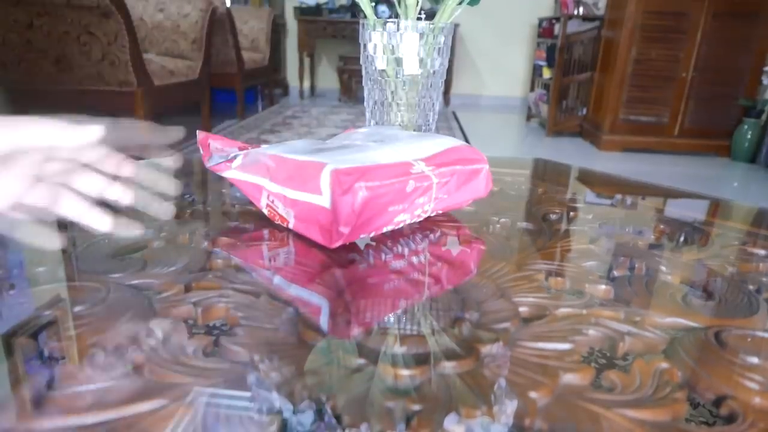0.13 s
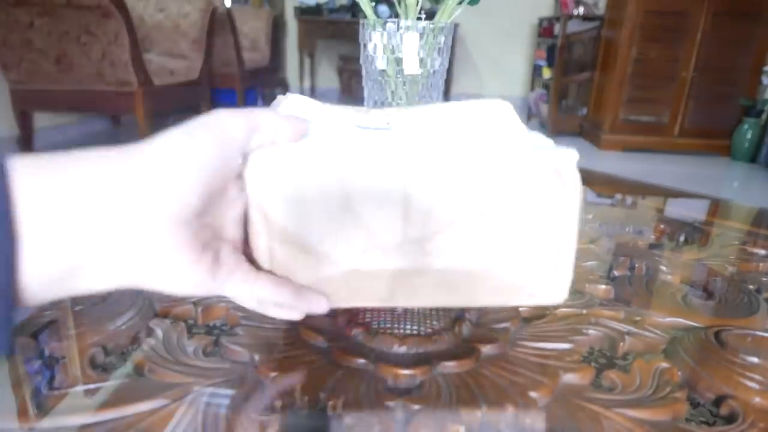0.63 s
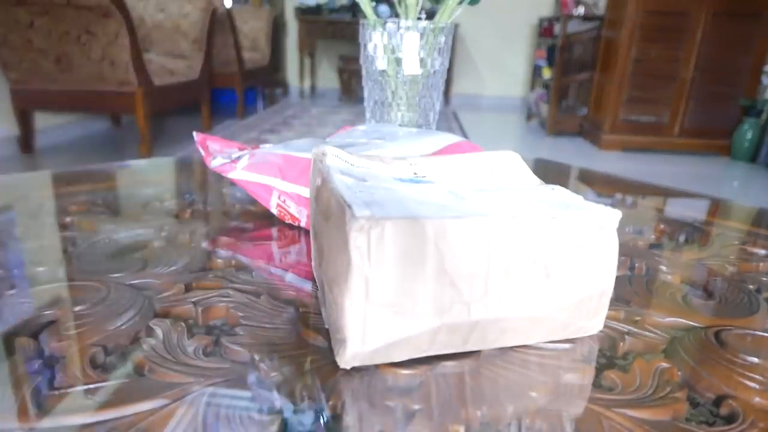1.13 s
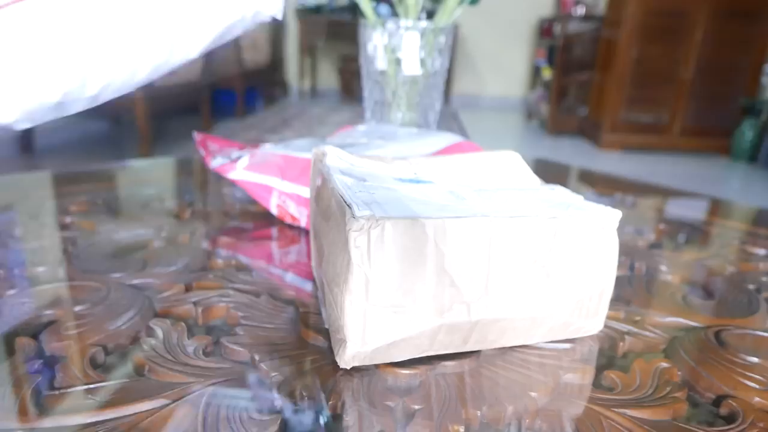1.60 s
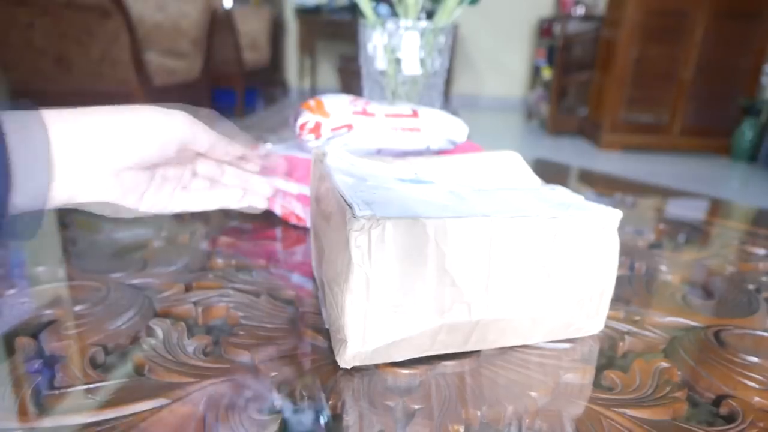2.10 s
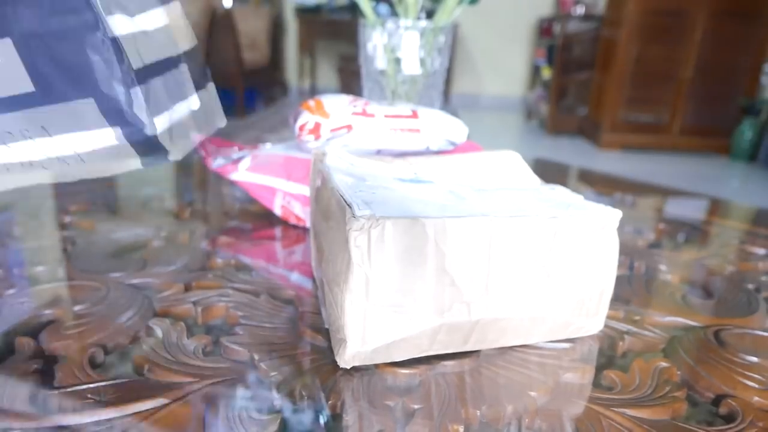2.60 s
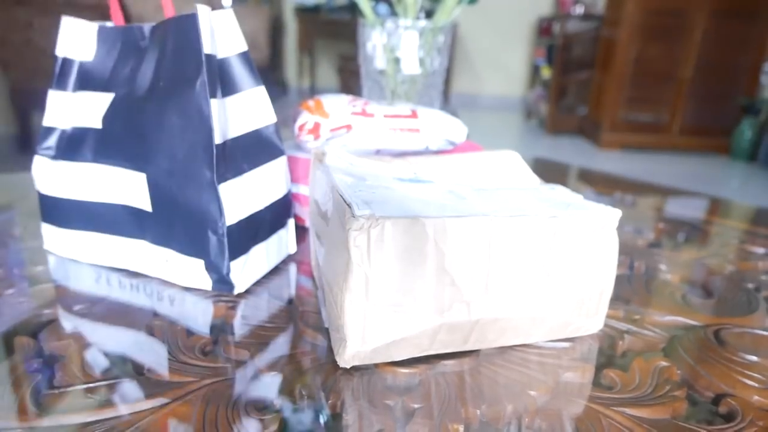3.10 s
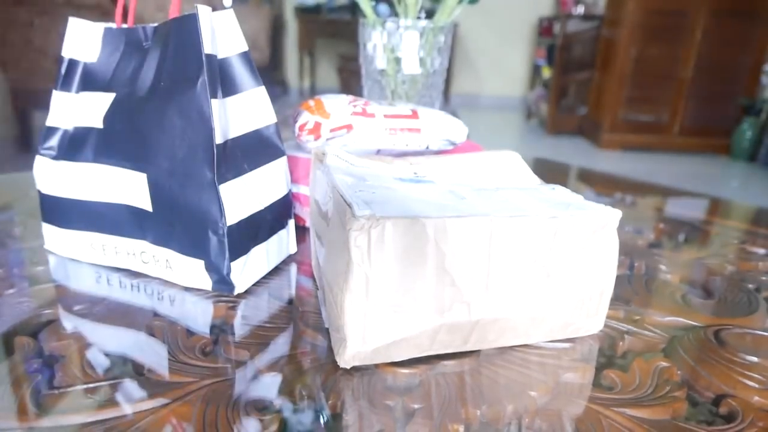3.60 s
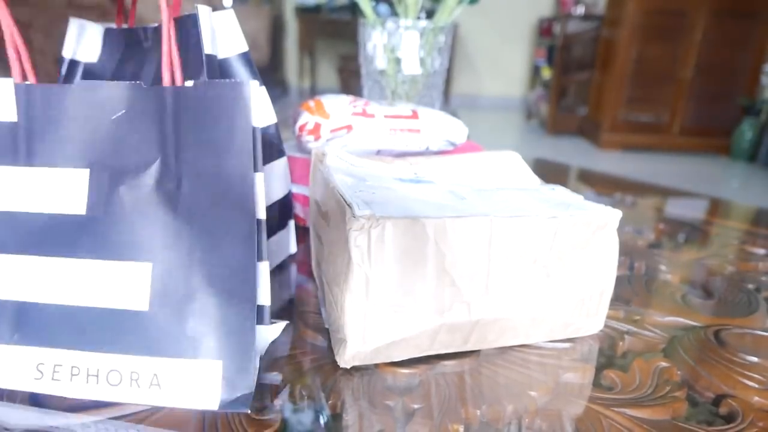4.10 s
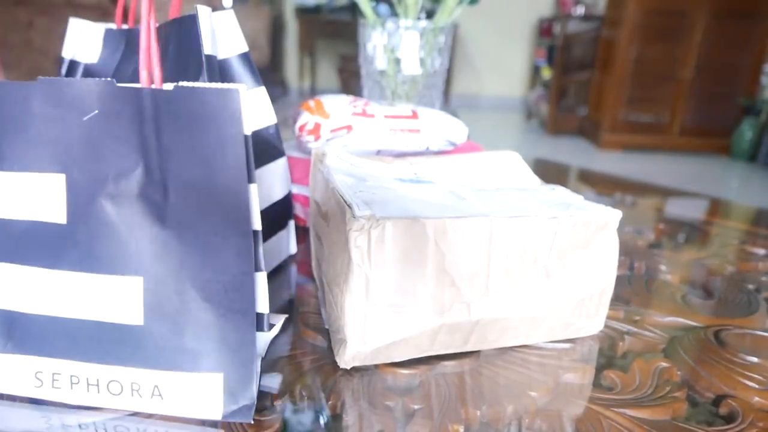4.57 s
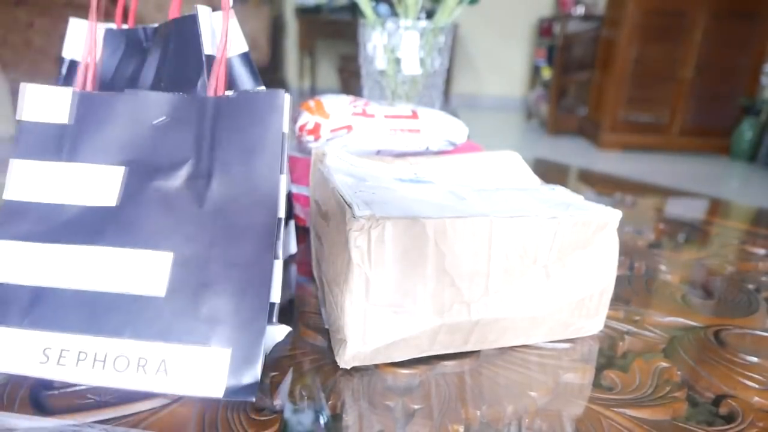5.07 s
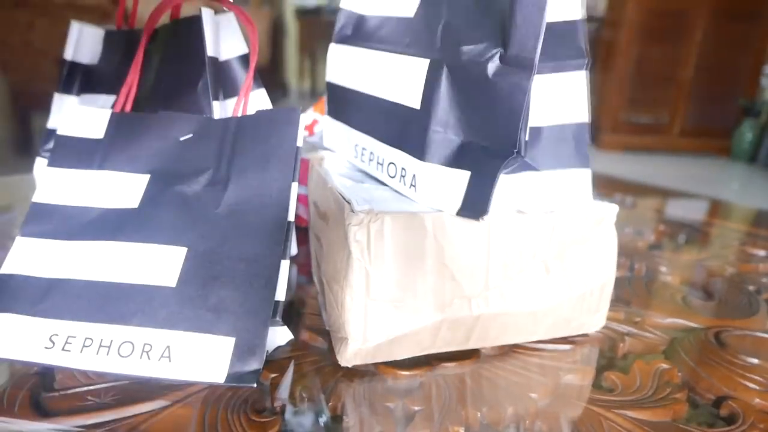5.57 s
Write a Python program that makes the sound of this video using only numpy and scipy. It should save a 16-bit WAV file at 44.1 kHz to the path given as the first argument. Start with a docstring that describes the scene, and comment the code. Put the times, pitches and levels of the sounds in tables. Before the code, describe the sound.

Quick wrapping crackle, a pause, then a crunchy double knock as a parcel meets the glass tabletop. Next comes a lighter rustling pack with a short film squeak, then two hard bag thumps about a second apart, and finally a cluster of loud paper cracks and knocks. The room answers with a short diffuse tail; a steady low hum lies beneath. Close stereo phone pickup, slightly shifting left and right.

```python
"""Parcels and paper bags are set down one after another on a glass-topped table in a tiled room, near a phone.
Each landing is a burst of pushes that rings load and table top while the wrapping crunches.
Creases snap as short ringing cracks, paper rustles as crackle in hiss, plastic film creaks in quickening slips.
A diffuse noise tail answers as the room; below lies a steady hum of noise bands, with faint noise chirps outside.
The level dips briefly five times."""
import sys
import numpy as np
from scipy import signal
from scipy.fft import rfft, irfft
from scipy.io import wavfile
from scipy.ndimage import uniform_filter1d

SR = 44100
rng = np.random.default_rng(int(sys.argv[2]) if len(sys.argv) > 2 else 0)


def to_linear_factor(level_db):
    """Convert decibel levels (scalar or array-like) to linear amplitude factors."""
    exponent = np.asarray(level_db, float) / 20
    return 10 ** exponent


def transcribe(signal):
    """Save signal, clipped to [-1, 1], as a 16-bit WAV file at the path in sys.argv[1]."""
    frames = np.atleast_2d(signal).T
    limited = np.clip(frames, -1, 1)
    pcm = np.round(limited * 32767).astype(np.int16)
    wavfile.write(sys.argv[1], SR, pcm)


N = 251193
T = np.arange(N) / SR
OPPOSITE = np.array([[1], [-1]])  # side signal: inverted on the right


def shape(x, points):
    """Zero-phase filter through (f/Hz, gain/dB) points, linear in log frequency."""
    hz, db = np.transpose(points)
    size = x.shape[-1]
    log_f = np.log(np.fft.rfftfreq(size, 1 / SR) + 1)
    gain = to_linear_factor(np.interp(log_f, np.log(hz), db))
    return irfft(rfft(x) * gain, size)


def unit(x):
    """Scale to rms 1."""
    return x / np.sqrt(np.mean(x ** 2))


def band(x, lo_hz, hi_hz):
    """Gentle causal band-pass."""
    return signal.sosfilt(signal.butter(1, [lo_hz, min(hi_hz, .45 * SR)], "band", fs=SR, output="sos"), x)


def dull(x, top_hz):
    """Second-order low-pass."""
    return signal.sosfilt(signal.butter(2, min(top_hz, .45 * SR), fs=SR, output="sos"), x)


def thin(x):
    """Small objects radiate almost no deep bass: steep high-pass."""
    return signal.sosfilt(signal.butter(6, 120, "high", fs=SR, output="sos"), x)


def fade(t, t60):
    """Exponential decay, 60 dB in t60 seconds (at least 2 ms)."""
    return np.exp(-np.log(1000) * t / max(t60, .002))


def walk(rate):
    """Random levels held 1 / rate seconds, then smoothed twice."""
    k = int(SR / rate)
    held = np.repeat(rng.standard_normal(N // k + 1), k)
    return 0.82 * uniform_filter1d(uniform_filter1d(held, k), k)[:N]


def crackle(size, rate, spread_db):
    """Random clicks of uneven size, rate per second, at rms 1."""
    hits = rng.random(size) < rate / SR
    return unit(hits * rng.standard_normal(size) * to_linear_factor(spread_db * rng.exponential(size=size)))


def modes(table, t, spread_db, detune):
    """Sum of decaying sines from (f/Hz, level/dB, T60/s) rows, level and pitch varied at random per strike."""
    luck = rng.standard_normal((len(table), 2))
    return sum(to_linear_factor(db + spread_db * a) * np.sin(2 * np.pi * hz * (1 + detune * b) * t) * fade(t, ring)
               for (hz, db, ring), (a, b) in zip(table, luck))


def sides(pan_db):
    """Left and right gains for a left-minus-right difference."""
    return to_linear_factor(np.array([pan_db, -pan_db]) / 2)


def place(s):
    """Left and right gains where the hands are at work at time s."""
    # hand position: t/s, left minus right/dB
    pan = [(0, 2), (.55, 4.5), (.75, 0), (1.6, 6.5), (1.95, 1), (2.84, 5), (3.0, -3.5), (3.2, 6.5),
           (4.13, 6), (4.25, -3), (4.42, 8), (5.1, 6), (5.3, -1), (5.7, -1)]
    return sides(np.interp(s, *np.transpose(pan)))


def add(out, s, x):
    """Mix a short sound in at time s."""
    i = int(s * SR)
    out[..., i:i + x.shape[-1]] += x[..., :N - i]


def hum():
    """Fans and distant traffic: noise in half-octave bands that waver together and apart."""
    # mid spectrum: f/Hz, density/dB per Hz
    colour = [(15, -50), (40, -29), (80, -28.5), (108, -27.5), (130, -12.5), (170, -8), (242, -3.5),
              (344, -2), (373, -9), (695, -13.5), (754, -7), (911, -14.5), (988, -16), (1890, -26),
              (14000, -41), (16000, -48)]
    # stereo width: f/Hz, side minus mid/dB
    width = [(60, -23), (110, -8), (200, -31), (380, -16.5), (700, -9), (1290, -1.5), (2380, -2.5),
             (4400, -5), (8120, -5), (15000, -3)]
    mid, side = shape(rng.standard_normal((2, N)), colour)
    both = (mid + shape(side, width) * OPPOSITE) / np.sqrt(np.mean(mid ** 2))
    out, swell = 0, walk(1.79)
    for hz in 30 * 2 ** np.arange(0, 9.1, .5):
        skirts = [(hz / 2 ** .5, -80), (hz / 2 ** .25, -6), (hz, 0), (hz * 2 ** .25, -6), (hz * 2 ** .5, -80)]
        waver_db = 0.17 * swell + 0.99 * walk(6.31)
        out = out + to_linear_factor(waver_db) * shape(both, skirts)
    return to_linear_factor(-46.5) * unit(out)


def rustle():
    """Handled wrappings: tiny crackles in a rubbing hiss; the push on the table adds a dull rumble."""
    # swell per squeeze or slide: peak t/s, level/dB, rise/s, fall/s, treble against level/dB
    handling = [(0.002, -41.5, 0.014, 0.22, -1.5), (.078, -51, .05, 0.13, -14),
                (.525, -53.5, .03, 0.31, -11), (0.684, -31.5, 0.076, 0.13, -2.5),
                (0.75, -28, 0.036, 0.15, -4), (.93, -41, 0.17, 0.22, -8), (1.3, -55, 0.99, 0.12, -10),
                (1.42, -50.5, 0.3, 0.35, -9), (1.662, -45.5, 0.057, 0.37, -5),
                (1.838, -49.5, 0.039, 0.076, 0), (1.886, -41, .07, 0.14, -4),
                (1.948, -28.5, 0.0094, 0.19, -7), (2.824, -54, 0.4, 0.059, -5),
                (2.842, -23, 0.0061, 0.13, -13.5), (2.88, -26.5, 0.032, 0.084, -15.5),
                (2.965, -52.5, .05, .3, -16), (3.172, -57, 0.013, .45, -24),
                (4.131, -21.5, .007, 0.036, -10), (4.149, -34, 0.024, .14, -10.5),
                (4.232, -59, .05, 0.55, -12), (4.42, -58.5, .1, 0.047, -9), (5.25, -56, 0.082, 0.52, -4),
                (5.321, -28.5, 0.015, 0.13, -5), (5.404, -33, 0.071, 0.15, -2.5),
                (5.5, -47, 0.14, 0.29, -5.5), (5.674, -33.5, 0.064, 0.12, -11.5)]
    # paper spectrum: f/Hz, density/dB per Hz
    colour = [(530, 0), (900, 3.5), (2330, 1.5), (2730, -2), (2960, 1), (4920, -2.5), (9770, -4.5),
              (14700, -10.5), (16000, -28)]
    swell_db, rumble_db = 30, -7  # climb and drop over rise and fall; rumble against rustle
    level, treble = 0, 0
    for s, db, rise_s, fall_s, treble_db in handling:
        away = np.maximum((s - T) / max(rise_s, .002), (T - s) / max(fall_s, .01))
        swell = to_linear_factor(db - swell_db * away)
        level = level + swell
        treble = treble + to_linear_factor(treble_db) * swell
    mid, side = to_linear_factor(2.8 * walk(60)) * rng.standard_normal((2, N))
    grains = .45 * crackle(N, 3500, spread_db=2.5)
    raw = shape(grains + mid + 0.4 * side * OPPOSITE, colour)
    low = shape(raw, [(5500, 0.5), (8000, -35.5)])
    paper = level * unit(low) + treble * unit(raw - low)
    rumble = unit(shape(mid, [(40, -90), (90, -45), (160, 11.5), (350, 17), (900, 5.5), (1500, -60)]))
    return place(T) * paper + to_linear_factor(rumble_db) * level * rumble


def snaps():
    """A buckling crease: one sharp crack that rings the sheet, a few milliseconds of noise, quick echoes."""
    # creases: t/s, peak/dB, pitch f/Hz, crack against sheet/dB
    creases = [(0.054, -29.5, 1670, 1), (0.071, -28, 4300, 7), (0.121, -18.5, 4240, 11),
               (0.1335, -38, 9000, -10), (0.3975, -29.5, 2460, 0.5), (0.4573, -35, 3900, -29.5),
               (0.516, -39.5, 2370, -7), (0.6585, -27, 2970, -10), (0.6704, -23.5, 1900, -2),
               (0.7425, -10.5, 4300, 5), (0.792, -15.5, 1940, 0.5), (0.8855, -25.5, 1800, 3),
               (0.929, -30, 2600, -8), (0.9432, -23.5, 3300, 1), (1.6468, -26.5, 5830, -5),
               (1.6756, -27.5, 4300, 11), (1.731, -35, 5960, -6), (1.748, -32, 4300, 2),
               (1.7585, -24, 4340, 1), (1.7884, -39, 4850, 3), (1.8827, -26.5, 4540, 0),
               (1.934, -26, 2540, -16), (1.9419, -15.5, 2540, 2), (1.975, -12.5, 2610, 4),
               (2.0064, -22.5, 4280, 9), (2.8783, -9.5, 1340, -16), (2.8828, -8, 3100, -19),
               (2.9159, -25, 5010, -17), (3.123, -41.5, 3500, -25), (3.168, -16, 2860, -24),
               (3.2735, -30, 12000, -20), (4.129, -8, 1380, -7), (4.1385, -5, 2350, -30),
               (4.1759, -16, 2320, -28), (4.4117, -31, 2190, -11), (4.361, -43, 4800, -25),
               (4.439, -40, 1940, -10), (5.0425, -30.5, 4280, 7), (5.3223, -14.5, 5000, 3),
               (5.339, -5.5, 1580, -9.5), (5.3762, -3.5, 2850, -29), (5.3963, 0, 2660, -9.5),
               (5.409, -15, 4300, 10), (5.4872, -23.5, 1630, -19), (5.538, -27, 2100, 0),
               (5.5578, -21.5, 1490, -23), (5.6096, -28, 2450, -19), (5.6513, -4, 1640, -11),
               (5.682, -9.5, 4470, -14), (5.6888, -14, 2090, -9)]
    # nearest surfaces: delay/s, level/dB
    echoes = [(.0005, -5), (.0021, -4), (.0034, -14)]
    out, t = np.zeros((2, N)), T[:SR // 15]
    for s, db, hz, treble_db in creases:
        ring_s = 0.0073 + 0.01 * db  # 7.3 ms at 0 dB; the 2 ms floor in fade() holds from about -0.5 dB down
        noise = .33 * rng.standard_normal(len(t)) * fade(t, ring_s)
        noise[int(.0003 * SR)] -= 1.6  # the buckling jolt
        body = band(band(noise, hz / 0.97, hz * 1.22), hz / 1.9, hz * 0.9)
        broad = band(band(noise, hz / 2.0, hz * 2.67), hz / 1.8, hz * 2.55)
        sheet = dull(body + 0.39 * broad, hz * 1.94)
        crack = band(band(noise * fade(t, ring_s), 3800, 15500), 3000, 15600)
        snap = sheet / np.abs(sheet).max() + to_linear_factor(treble_db) * crack / np.abs(crack).max()
        stretch = 1 + 0.303 * rng.standard_normal(len(echoes))
        snap = snap + sum(to_linear_factor(echo_db) * np.interp(t - delay * k, t, snap, left=0)
                          for (delay, echo_db), k in zip(echoes, stretch))
        add(out, s, to_linear_factor(db) * place(s)[:, None] * snap / np.abs(snap).max())
    return out


def thuds():
    """A soft load lands in one push and a scatter of smaller ones; load and table top ring, wrapping crunches."""
    # landings: peak t/s, peak/dB, load pitch f/Hz, settling T60/s, crunch level/dB
    landings = [(0.6725, -24.5, 617, 0.018, -36), (0.6923, -34, 590, 0.035, -43),
                (0.7443, -11.5, 590, 0.023, -31), (0.7877, -17, 350, 0.02, -35),
                (0.887, -13.5, 316, 0.024, -47), (0.9319, -26, 600, 0.067, -44),
                (1.693, -32.5, 410, 0.05, -50), (1.9456, -23.5, 550, 0.013, -54),
                (1.9702, -17, 490, 0.034, -45), (2.027, -26, 440, 0.03, -40.5),
                (2.5114, -34.5, 195, 0.077, -66.5), (2.846, -2.5, 562, 0.031, -23),
                (2.8706, -9.5, 780, 0.033, -25), (2.8866, -8.5, 517, 0.063, -31),
                (3.0173, -24, 690, 0.017, -55), (3.1674, -20.5, 880, 0.023, -39),
                (4.131, -11.5, 755, 0.027, -28), (4.1332, -10.5, 253, 0.062, -27),
                (4.1436, -8.5, 259, 0.0079, -31), (4.415, -21.5, 590, 0.02, -43),
                (5.3219, -15.5, 338, 0.057, -33), (5.3541, -26, 626, 0.021, -31),
                (5.3991, -16.5, 406, 0.024, -25.5), (5.559, -23.5, 524, 0.025, -42),
                (5.6521, -26, 1380, 0.043, -38)]
    # table-top modes: f/Hz, level/dB, ring T60/s
    top_modes = [(140, -8, 0.16), (161, -5.5, 0.19), (221.3, 4.5, 0.2), (270.3, 3.5, 0.1),
                 (362, 3.5, 0.075), (451, -3, 0.055), (520, -13, 0.03), (590, -4, 0.037), (690, 1, 0.085),
                 (780, -15, 0.023), (870, -20, 0.03), (1060, 4.5, 0.031), (1160, -13, 0.036),
                 (1520, 2, 0.027), (1720, -1.5, 0.04)]
    # wrapping spectrum: f/Hz, density/dB per Hz
    colour = [(590, -59), (1000, 14), (1540, 14.5), (2360, 1), (4260, -21), (5190, -22), (11000, -40.5),
              (16000, -81)]
    knock, crunch, t = np.zeros(N), np.zeros((2, N)), T[:SR // 3]
    for s, db, hz, settle_s, crunch_db in landings:
        scatter = 0.14 * rng.standard_normal(len(t)) * to_linear_factor(2.52 * rng.exponential(size=len(t)))
        pushes = scatter * fade(t, settle_s) * (1 - np.exp(-(t / .003) ** 2))
        pushes[0] += 1.5  # main push
        soft = np.hanning(int(SR / hz / 3) + 3)  # contact lasts about a third of the load's swing
        pushes = np.convolve(pushes, soft)[:len(t)]
        load = band(band(pushes, hz / 1.35, hz * 1.22), hz / 1.9, hz * 1.6)
        strike = modes(top_modes, t, spread_db=5.5, detune=0.025)
        top = signal.fftconvolve(band(pushes, hz / 5.0, hz * 2.1), strike)[:len(t)]
        top_db = -1.0 + 0.24 * db  # heavier blows drive the table more
        blow = thin(load / np.abs(load).max() + to_linear_factor(top_db) * top / np.abs(top).max())
        # early peak falls at s and points downward
        peak = np.abs(blow[:int(1.3 * SR / hz)]).argmax()
        add(knock, s - peak / SR, -to_linear_factor(db) * np.sign(blow[peak]) * blow / np.abs(blow).max())
        mid, side = rng.standard_normal((2, len(t)))
        grit = mid + 0.35 * crackle(len(t), 3000, spread_db=2.5) + 0.37 * side * OPPOSITE
        envelope = fade(t, 5.1 * settle_s) * (1 - np.exp(-t / 0.00053))
        add(crunch, s - .003, to_linear_factor(crunch_db) * unit(shape(grit, colour)) * envelope)
    return knock * np.ones((2, 1)), crunch


def chirps():
    """Faint chirps outside: narrow noise bands under smooth swells, independent left and right."""
    # chirps: t/s, length/s, f/Hz, level before the swell/dB
    calls = [(1.244, 0.11, 5060, -63), (2.19, 0.11, 5100, -62), (3.386, 0.061, 4420, -64),
             (3.42, 0.22, 5150, -64)]
    out = np.zeros((2, N))
    for s, length_s, hz, db in calls:
        size = int(length_s * SR)
        narrow = [(hz * .97, -40), (hz * .994, 0), (hz * 1.006, 0), (hz * 1.03, -40)]
        tone = shape(rng.standard_normal((2, size)), narrow)
        add(out, s, to_linear_factor(db) * unit(tone) * np.hanning(size))
    return out


def creak():
    """Plastic film slips and sticks ever faster; each slip rings it briefly."""
    # slip course: t/s, rate/slips per s, slip level/dB
    course = [(1.801, 135, -33), (1.815, 200, -33), (1.83, 280, -32), (1.844, 330, -33), (1.851, 330, -48)]
    # film modes: f/Hz, level/dB, ring T60/s
    film = [(900, -6, .012), (1300, -1, .013), (1750, -1, .013), (2250, 0, .012), (3400, -8, .009),
            (4000, -7, .008)]
    s, rate, db = np.transpose(course)
    live = (T >= s[0]) & (T < s[-1])
    slip_rate = live * np.interp(T, s, rate) * (1 + .08 * walk(200))
    count = np.floor(np.cumsum(slip_rate / SR) + live * .99)  # .99: first slip comes almost at once
    slips = (np.diff(count, prepend=0) > 0) * to_linear_factor(np.interp(T, s, db) + 1.1 * rng.standard_normal(N))
    ring = modes(film, T[:SR // 30], spread_db=1, detune=0)
    return -sides(3.5)[:, None] * signal.fftconvolve(slips, ring)[:N]


def room(x):
    """Diffuse tail: octave bands of decaying noise, shortest near 5 kHz, more alike left and right in the bass."""
    # decay: f/Hz, T60/s
    decay = [(100, 0.46), (700, 0.57), (2000, 0.36), (5000, 0.12), (14000, 0.56)]
    t = T[:SR * 2 // 3]
    mid, side = rng.standard_normal((2, len(t)))
    noise = mid + shape(side, [(200, -32.0), (600, -16.5), (1500, -16.5), (8000, 2.5)]) * OPPOSITE
    hz, t60 = np.transpose(decay)
    tail = 0
    for f in 62.5 * 2 ** np.arange(8.):
        t60_s = np.interp(np.log(f), np.log(hz), t60)
        tail = tail + band(noise, f / 2 ** .5, f * 2 ** .5) * fade(t, t60_s)
    tail = tail * (1 - np.exp(-t / 0.0098))
    return signal.fftconvolve(x, tail / np.sqrt(np.sum(tail ** 2) / 2), axes=1)[:, :N]


def scene():
    """Table, wrappings, room, hum and chirps together; all of it dips for a moment at times."""
    # dips: t/s, width/s, depth/dB
    dips = [(.506, 0.0029, -15), (1.642, 0.0042, -14.5), (2.577, 0.0061, -10.5), (3.944, 0.0049, -12),
            (5.212, 0.0031, -14)]
    knock, crunch = thuds()
    clicks = snaps() + thin(creak())
    paper = thin(crunch + rustle())
    tail = room(to_linear_factor(-10.5) * knock + to_linear_factor(-12.5) * clicks + to_linear_factor(-13.5) * paper)
    out = knock + clicks + paper + tail + hum() + chirps()
    dip_db = sum(db * np.exp(-((T - s) / width_s) ** 2) for s, width_s, db in dips)
    return out * to_linear_factor(dip_db)


def band_limit(x):
    """A steep low-pass at the top of the band."""
    return signal.sosfilt(signal.butter(12, 16650, fs=SR, output="sos"), x)


def record(dry):
    """The phone cuts the top: steep elliptic low-pass at 16 kHz."""
    mix = signal.sosfilt(signal.ellip(6, .2, 60, 16000, fs=SR, output="sos"), dry)
    return band_limit(mix)


dry = scene()
out = record(dry)
transcribe(out)
```